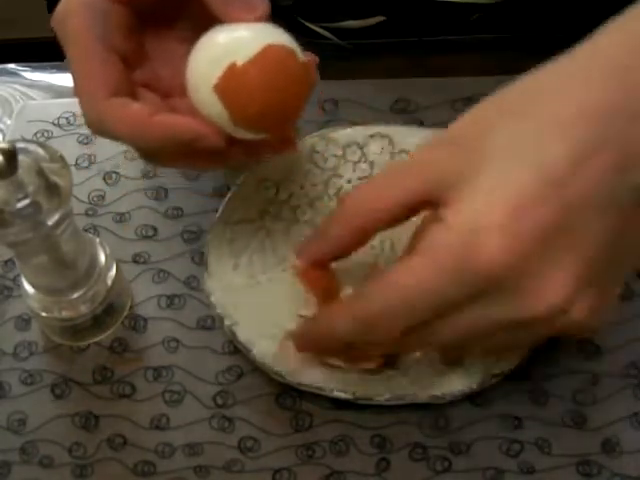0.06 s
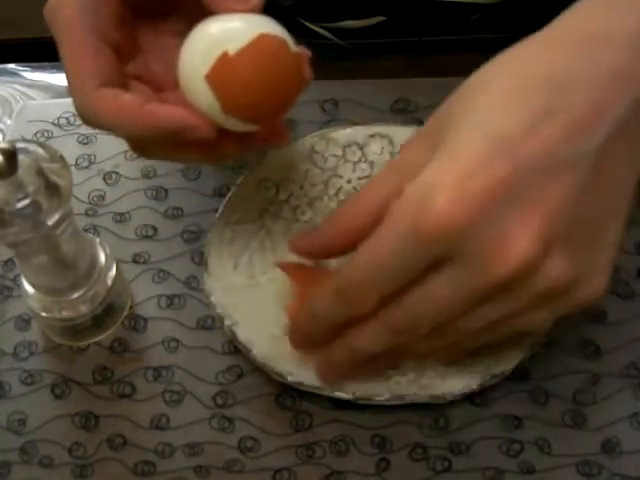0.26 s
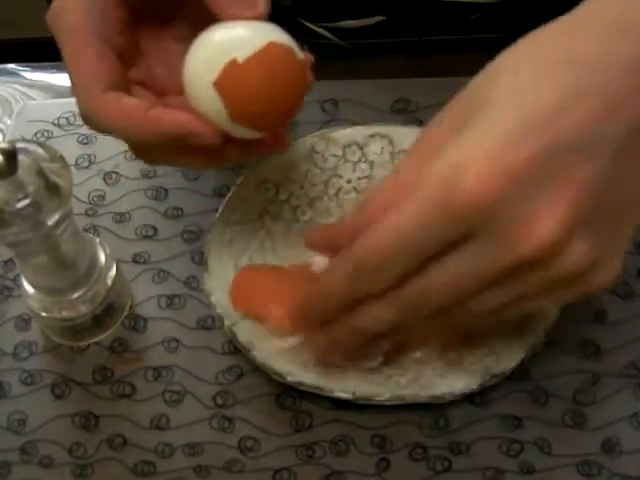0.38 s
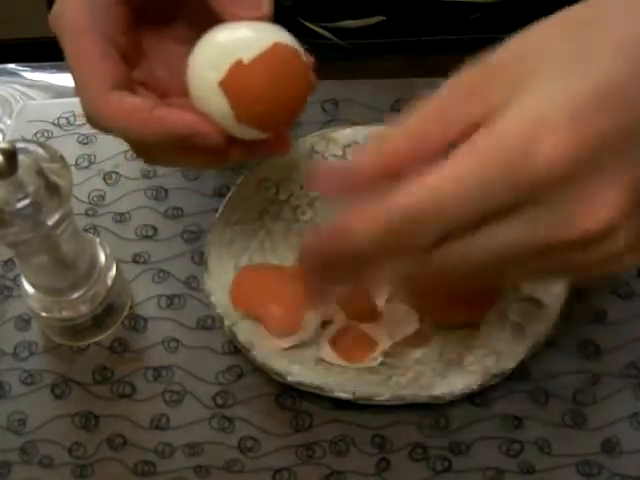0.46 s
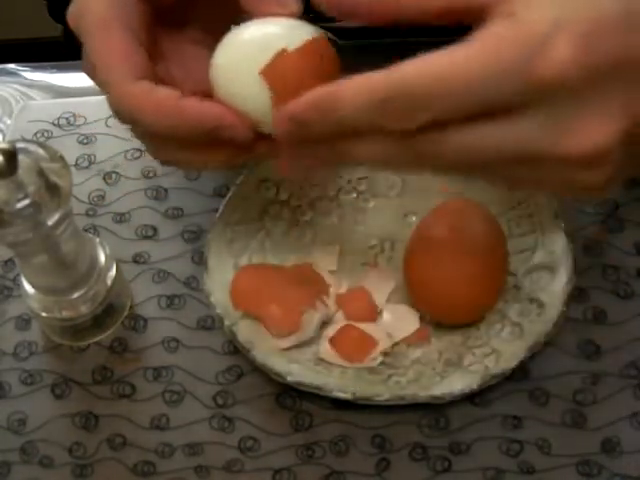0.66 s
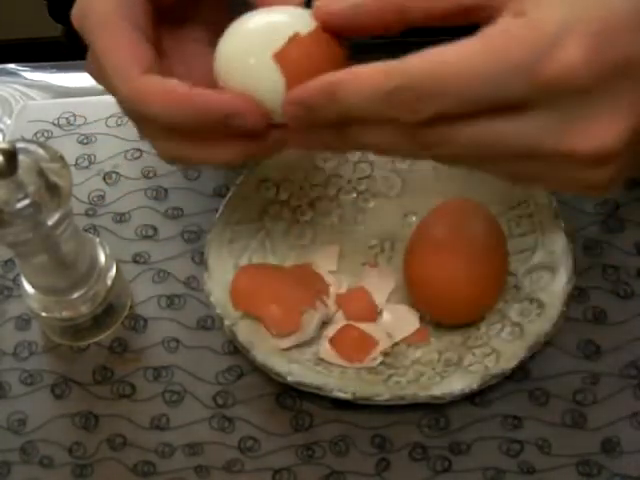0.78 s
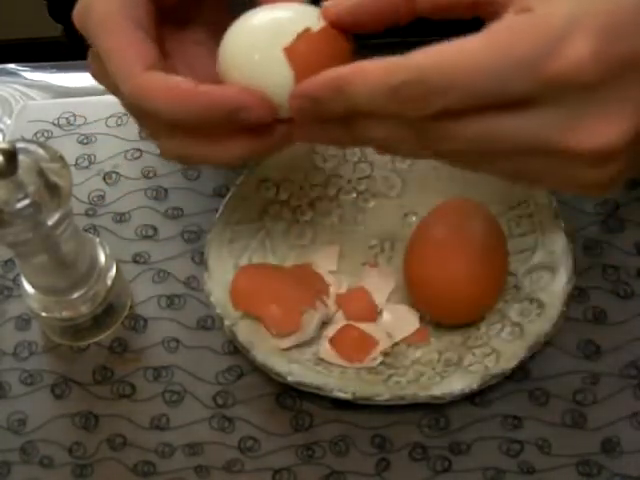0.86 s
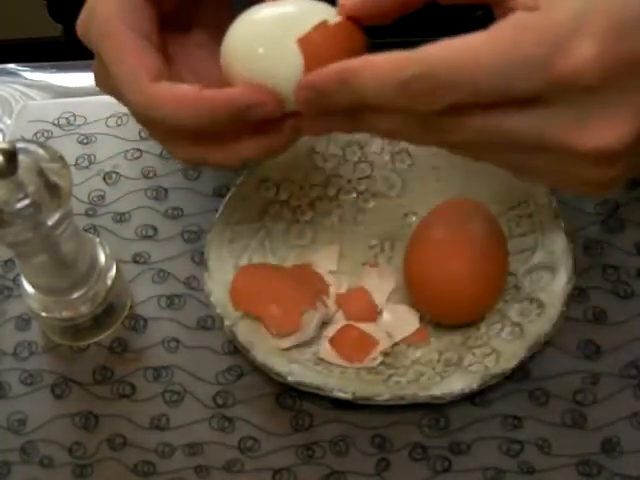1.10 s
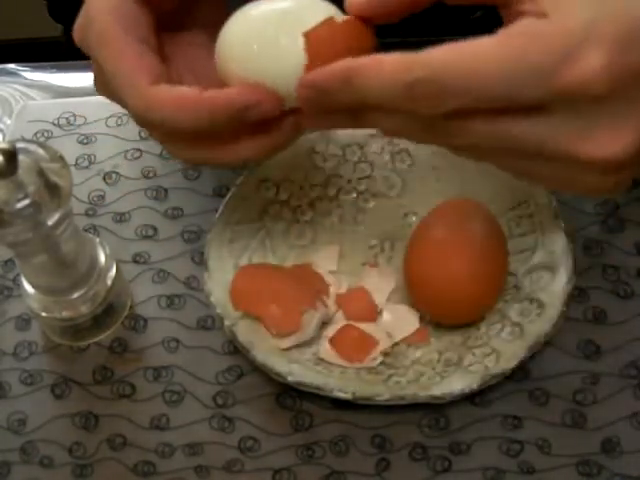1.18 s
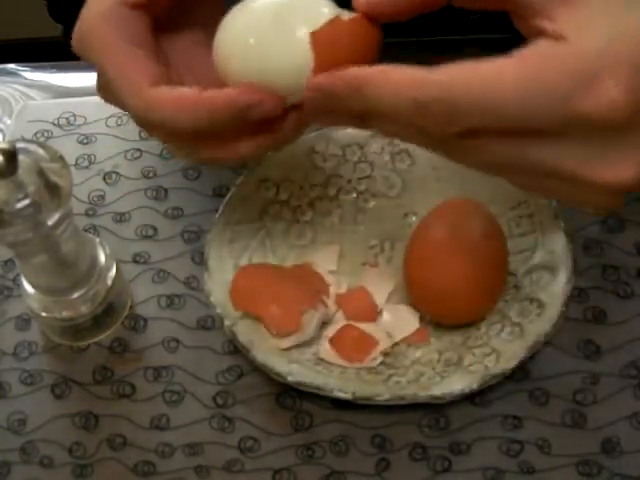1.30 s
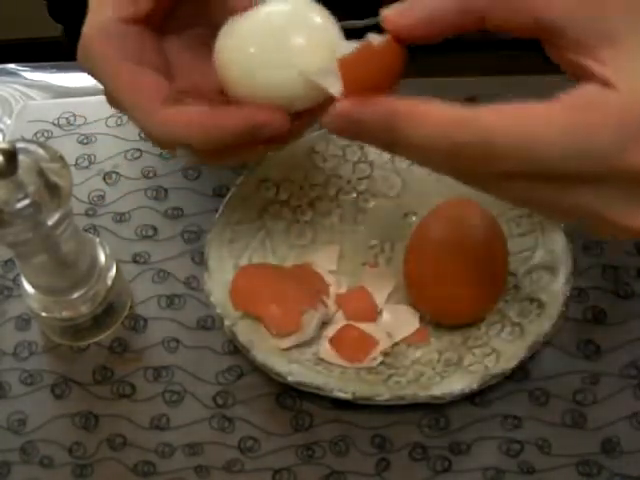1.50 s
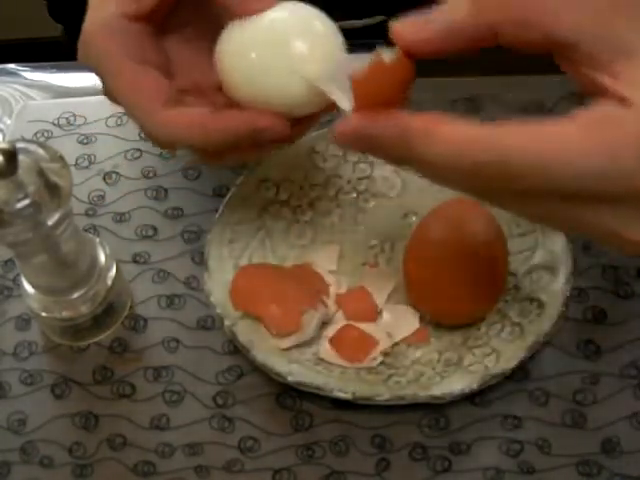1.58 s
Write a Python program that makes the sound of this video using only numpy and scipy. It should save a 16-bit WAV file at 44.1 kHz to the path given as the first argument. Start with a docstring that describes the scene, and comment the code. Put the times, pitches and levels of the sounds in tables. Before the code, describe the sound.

Eggshell pieces tick and clatter lightly on a ceramic plate, then faint peeling crackles.

```python
"""Pieces of eggshell land on a ceramic plate: dry ticks, then a small clatter that rings the plate.
Each contact is a short noise crack with a low push, plus the damped modes of plate and table.
The hand lifts away with a faint squeak, then peels the boiled egg: a grainy crackle of rubbing
shell, a few tiny ticks and one clear snap. One close microphone, a small quiet room with a low hum."""
import sys
import numpy as np
from scipy import signal
from scipy.fft import rfft, irfft, next_fast_len
from scipy.io import wavfile

SR = 44100
rng = np.random.default_rng(int(sys.argv[2]) if len(sys.argv) > 2 else 0)


def store_wav(level_fs):
    """Save 16-bit WAV to argv[1]."""
    pcm = np.round(np.clip(np.atleast_2d(level_fs), -1, 1) * 32767)
    wavfile.write(sys.argv[1], SR, pcm.T.astype(np.int16))


N = 72765


def shell_on_plate():
    """Each contact ticks, rings the modes that its spot on the plate favours, and nudges the table."""
    # shell meeting the plate: t/s, tick/dB, tick pitch/Hz, ring/dB, favoured ring pitch/Hz, push/dB
    contacts = [(.0127, -46, 5000, -51, 3000, -62), (.0145, -50, 6200, -55, 6200, -70),
                (.2155, -25, 7000, -50, 4200, -48), (.2548, -35, 7200, -62, 4100, -60),
                (.2810, -31, 7200, -65, 4100, -58), (.2862, -39, 6500, -68, 4100, -60),
                (.3022, -33, 5400, -67, 4000, -58), (.3043, -34, 4300, -65, 4000, -58),
                (.3099, -33, 4800, -67, 4000, -58), (.3131, -21, 6900, -44, 4200, -23),
                (.3146, -27, 7200, -62, 4200, -45), (.3623, -37, 6800, -68, 4000, -60),
                (.3787, -16, 4600, -32, 2700, -24), (.3794, -21, 7600, -43, 6000, -40),
                (.3855, -31, 7500, -54, 4500, -50), (.3940, -17, 6700, -41, 5500, -32),
                (.3975, -22, 6600, -48, 5000, -42), (.4027, -26, 5000, -48, 4500, -46),
                (.4049, -25, 7000, -39, 2400, -46), (.4067, -26, 5500, -48, 4500, -46)]
    # the plate's modes: f/Hz, relative level/dB, t60/s
    plate_modes = [(1115, -7.5, 0.25), (2366, -1, 0.2), (2438, -9, 0.13), (3160, -17, 0.27),
                   (3424, -14, 0.24), (4022, -2, 0.2), (4220, -12, 0.14), (4270, -17, 0.16),
                   (4500, -8, 0.16), (4870, -7, 0.14), (5670, -11, 0.11), (6127, 3, 0.1), (6235, -6, 0.24),
                   (7300, -12, 0.092)]
    # the plate's knock on the table under it: f/Hz, relative level/dB, t60/s
    table_modes = [(222, -25, .19), (238.5, -19.5, .15), (391.7, -24.5, 0.2), (1624, -7, 0.022),
                   (1860, -8, 0.013), (2134, -9, 0.041)]
    track = np.zeros(N)
    for start, tick_db, tick_hz, ring_db, ring_hz, push_db in contacts:
        spot = lambda f: bell_curve(f, ring_hz, width_oct=.4, floor_db=-11)
        ringing = amp(ring_db) * (ring(plate_modes, spot) + ring(table_modes))
        tick = shell_tick(tick_db, tick_hz, push_db, t60=.0052, width_oct=.25, floor_db=-7.5)
        add(track, start, in_room(tick, room_db=-9))
        add(track, start, in_room(ringing, room_db=-11))
    return track


def shell_tick(db, hz, push_db, t60, width_oct, floor_db):
    """A shell fragment: a crack dying within milliseconds around its pitch, and one low push."""
    # tone colour of the shell ticks, with the microphone's treble roll-off: f/Hz, relative level/dB
    tick_colour = [(100, -22.5), (1000, -8), (2000, -5), (3500, -1.5), (4300, 2), (5500, -2), (7500, -1),
                   (8800, 0), (10000, -10), (11200, -19.5), (12400, -32)]
    push_hz, push_decay_s = 1080, .00029
    t = np.arange(SR // 25) / SR
    fade = amp(-60 * t / t60)
    colour = lambda f: amp(along(tick_colour, f)) * bell_curve(f + 1, hz, width_oct, floor_db)
    crack = coloured(rng.choice([-1, 1], len(t)) * fade, colour)
    crack *= np.linalg.norm(fade) / np.linalg.norm(crack)  # keep the burst's energy
    push = np.sin(2 * np.pi * push_hz * t) * np.exp(-t / push_decay_s)
    return amp(db) * crack[:len(t)] + amp(push_db) * push


def ring(modes, weight=lambda hz: 1):
    """Damped modes, struck a little differently each time."""
    scatter_db, rise_s = 1.5, .001
    t = np.arange(SR // 3) / SR
    hz, db, t60 = np.transpose(modes)[:, :, None]
    db = db + scatter_db * rng.standard_normal(hz.shape)
    phase = 2 * np.pi * rng.random(hz.shape)
    tones = weight(hz) * amp(db - 60 * t / t60) * np.sin(2 * np.pi * hz * t + phase)
    return tones.sum(0) * (1 - np.exp(-t / rise_s))


def shell_snaps():
    """Bits of shell break between the fingers, away from the plate."""
    # shell breaking: t/s, level/dB, pitch/Hz, push/dB
    breaks = [(1.0660, -47.5, 7400, -70), (1.087, -47.5, 5900, -72), (1.1262, -51, 4400, -70),
              (1.1954, -37.5, 4070, -45), (1.1964, -46.5, 9150, -49), (1.602, -51.5, 8400, -70)]
    track = np.zeros(N)
    for start, db, hz, push_db in breaks:
        snap = shell_tick(db, hz, push_db, t60=.004, width_oct=.18, floor_db=-17)
        add(track, start, in_room(snap, room_db=-7))
    return track


def peeling_crackle():
    """Shell rubs on shell, and the loosened cap scrapes at its own pitch as it lifts from the egg."""
    # envelope of rubbing and peeling: t/s, level/dB
    rub_levels = [(0, -72), (.13, -63), (.2, -73.5), (.29, -54), (.36, -57), (.45, -70), (.95, -72.5),
                  (1.13, -65.5), (1.21, -64.5), (1.29, -68.5), (1.33, -62.5), (1.42, -65.5), (1.52, -70.5),
                  (1.65, -71)]
    # tone colour of the rubbing: f/Hz, relative level/dB
    rub_colour = [(1000, -12.5), (3300, -2.5), (4300, -6), (5300, -0.5), (6600, 0), (8700, -3),
                  (10000, -12), (12400, -65)]
    # envelope of the cap's scrape: t/s, level/dB
    scrape_levels = [(1.11, -87), (1.135, -64), (1.155, -78), (1.18, -71), (1.22, -74), (1.25, -79),
                     (1.33, -67), (1.5, -82)]
    rubbing = friction(rub_levels, lambda f: amp(along(rub_colour, f)))
    scrape = friction(scrape_levels, lambda f: resonance(f, hz=4330, half_width_hz=220))
    return rubbing + scrape


def friction(levels, colour):
    """Dense tiny grains, filtered and shaped by a level envelope."""
    grains_per_s, spread_db = 2000, 2
    onsets = rng.random(N) < grains_per_s / SR
    grains = onsets * rng.standard_normal(N) * amp(spread_db * rng.standard_normal(N))
    envelope = amp(np.interp(np.arange(N) / SR, *np.transpose(levels)))
    return envelope * unit(filtered(grains, colour))


def hand_squeak():
    """One soft, short tone that sags in pitch as the hand lifts away."""
    start_s, length_s, peak_db = .48, .1, -60
    start_hz, sag_hz_per_s = 642, 910
    t = np.clip(np.arange(N) / SR - start_s, 0, length_s)
    phase = 2 * np.pi * np.cumsum(start_hz - sag_hz_per_s * t) / SR
    return amp(peak_db) * np.sin(np.pi * t / length_s) * np.sin(phase)


def in_room(sound, room_db):
    """The sound with quick reflections off the table and hands, and the room's short tail."""
    # the room's decay: f/Hz, t60/s
    decay = [(200, 0.24), (2000, 0.35), (6000, 0.24), (10000, 0.21)]
    tail_rise_s, early_rise_s, early_t60_s, early_db = .0017, .00061, .041, .5
    hz, frame_s, spectrum = signal.stft(rng.standard_normal(SR // 3), SR, nperseg=256)
    spectrum = spectrum * amp(-60 * frame_s / along(decay, hz)[:, None])
    tail = signal.istft(spectrum, SR, nperseg=256)[1]
    t = np.arange(len(tail)) / SR
    tail *= 1 - np.exp(-t / tail_rise_s)
    early = rng.standard_normal(len(t)) * amp(-60 * t / early_t60_s) * (1 - np.exp(-t / early_rise_s))
    response = amp(room_db) * (tail / np.linalg.norm(tail) + amp(early_db) * early / np.linalg.norm(early))
    response[0] += 1  # direct sound
    return signal.fftconvolve(sound, response)


def room_tone():
    """A steady bed of air and hiss, with a narrow band of noise as a wavering hum."""
    # tone colour of the background hiss, with the microphone's treble roll-off: f/Hz, relative level/dB
    hiss_colour = [(20, 0), (115, -0.5), (176, -1), (240, -1.5), (290, -4.5), (355, -3.5), (452, -5.5),
                   (545, -6), (800, -9), (1500, -12.5), (3000, -16.5), (6000, -19.5), (8700, -22),
                   (9600, -24), (10600, -37), (11600, -45.5), (12400, -60)]
    hiss = filtered(rng.standard_normal(N), lambda f: amp(along(hiss_colour, f)))
    hum = filtered(rng.standard_normal(N), lambda f: resonance(f, hz=211.2, half_width_hz=4.8))
    return amp(-56) * unit(hiss) + amp(-66.5) * unit(hum)


def amp(db):
    """Decibels to gain."""
    return 10 ** (np.asarray(db) / 20)


def unit(x):
    """x at rms 1."""
    return x / np.sqrt(np.mean(x ** 2) + 1e-20)


def along(points, hz):
    """A curve of f/Hz, value points, read on a log frequency axis."""
    f, value = np.transpose(points)
    return np.interp(np.log(hz + 1), np.log(f + 1), value)


def bell_curve(f, hz, width_oct, floor_db):
    """A Gaussian gain bump around hz, standing on a flat floor."""
    return amp(floor_db) + np.exp(-.5 * (np.log2(f / hz) / width_oct) ** 2)


def resonance(f, hz, half_width_hz):
    """The gain of one resonant peak."""
    return 1 / (1 + ((f - hz) / half_width_hz) ** 2)


def filtered(x, gain):
    """A whole track through a zero-phase filter of gain(f)."""
    size = next_fast_len(N + SR // 4)
    return irfft(rfft(x, size) * gain(np.fft.rfftfreq(size, 1 / SR)), size)[:N]


def coloured(x, gain, size=4096):
    """A short sound through a minimum-phase filter of gain(f), which keeps its attack sharp."""
    magnitude = np.maximum(gain(np.fft.rfftfreq(size, 1 / SR)), 1e-6)
    cepstrum = irfft(np.log(magnitude))
    cepstrum[1:size // 2] *= 2
    cepstrum[size // 2 + 1:] = 0
    return irfft(rfft(x, size) * np.exp(rfft(cepstrum)))


def add(track, start_s, sound):
    """Mix a sound into the track at start_s."""
    i = max(round(start_s * SR), 0)
    track[i:i + len(sound)] += sound[:N - i]


def scene():
    """Plate, egg and room at one microphone."""
    return (room_tone() + peeling_crackle() + shell_snaps() + shell_on_plate() + hand_squeak())[None]


def record(dry):
    """A brick-wall low-pass takes off the top treble."""
    top_hz = 12462
    return np.array([filtered(x, lambda f: f < top_hz) for x in dry])


dry = scene()
out = record(dry)
store_wav(out)
```